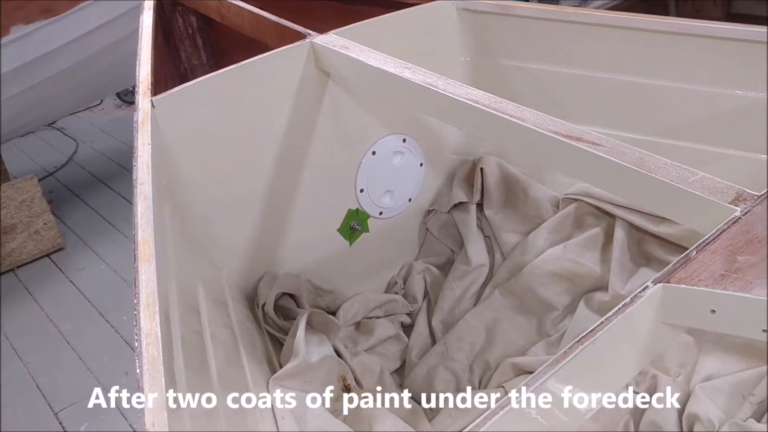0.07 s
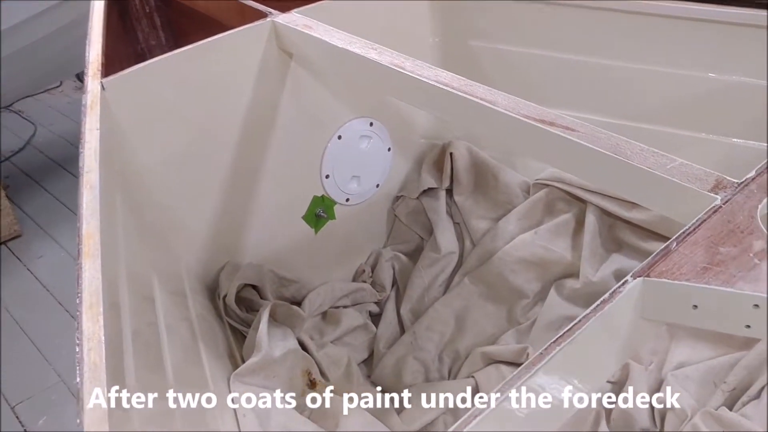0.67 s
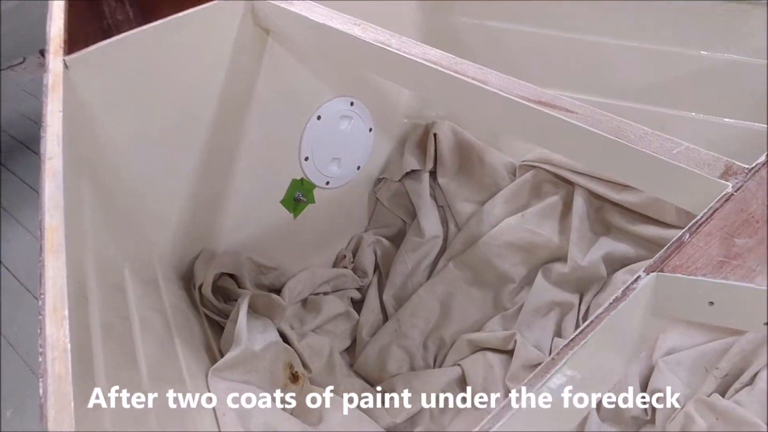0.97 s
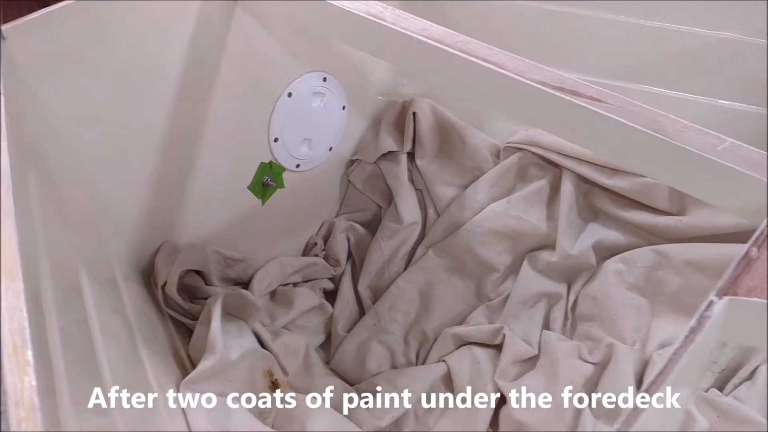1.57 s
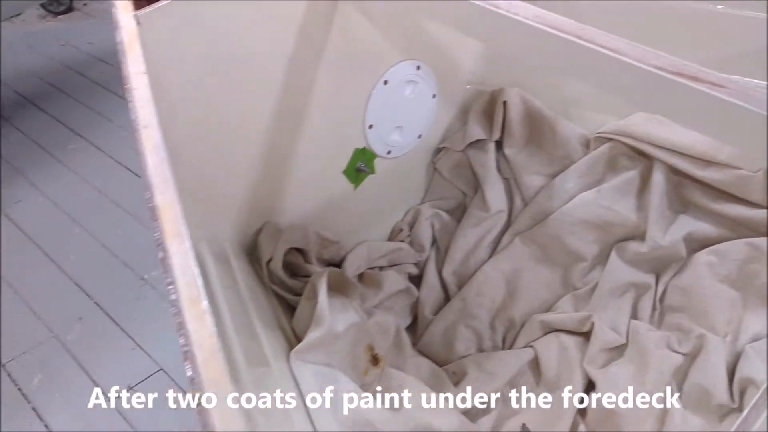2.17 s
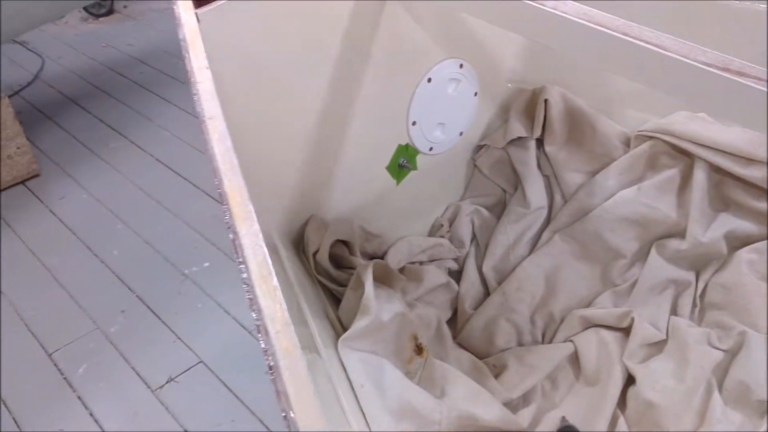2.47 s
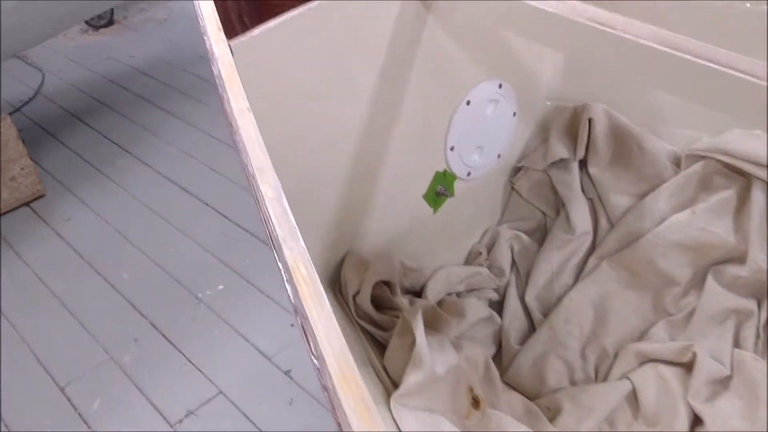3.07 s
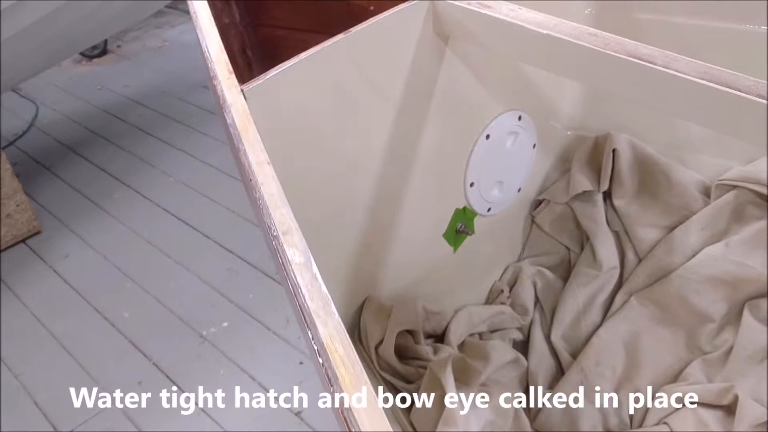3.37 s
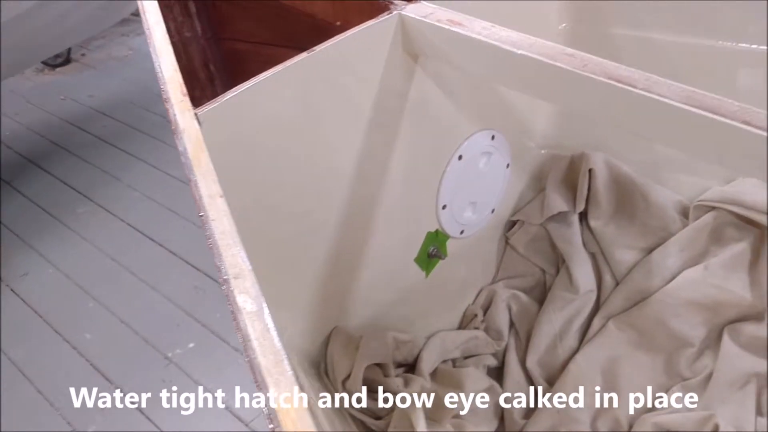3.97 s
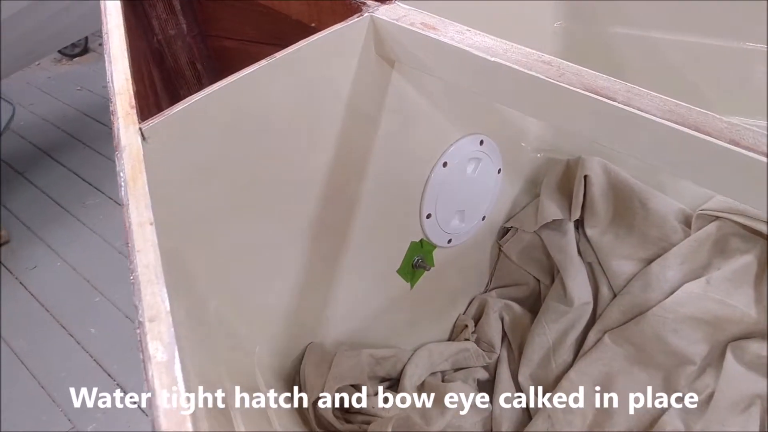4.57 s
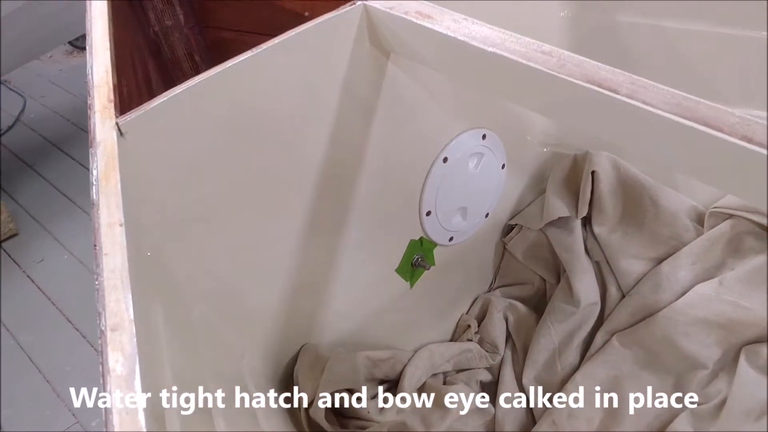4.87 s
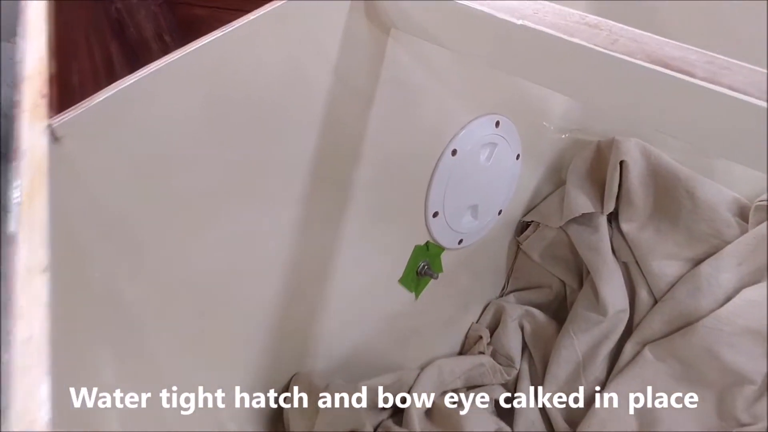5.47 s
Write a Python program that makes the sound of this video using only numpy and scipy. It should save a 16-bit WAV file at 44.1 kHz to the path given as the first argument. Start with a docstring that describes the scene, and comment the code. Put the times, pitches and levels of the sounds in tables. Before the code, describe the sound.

Slow, uneven footsteps thump on a wooden plank floor in a workshop, with light knocks and scuffs over a low hum.

```python
"""Slow steps in a barn workshop

Someone carrying a camera walks unevenly over a plank floor. Each shoe touches, lands and settles;
the boards boom and the room rings on. A few light knocks sound close by, shoes scuff, and a machine
hums under a soft hiss. The camera turns its volume down after heavy steps, then slowly back up."""
import sys
import numpy as np
from scipy import signal
from scipy.fft import rfft, irfft, next_fast_len
from scipy.io import wavfile
from scipy.ndimage import uniform_filter1d, minimum_filter1d

SR = 44100
rng = np.random.default_rng(int(sys.argv[2]) if len(sys.argv) > 2 else 0)


def master(y):
    """Save y as 16-bit WAV."""
    cut = np.clip(np.atleast_2d(y).T, -1, 1)
    pcm = np.round(cut * 32767)  # scale
    wavfile.write(sys.argv[1], SR, pcm.astype(np.int16))


N = 242991

# How long the barn rings. Each row: frequency in Hz, seconds to fade by 60 dB.
RING_TIMES = [(120, 0.43), (320, 0.47), (600, 0.47), (1200, 0.44), (2200, 0.42), (5800, 0.3), (12000, 0.25)]


def footstep(start, force_db, thud_db, click_db, early_s, touch_db, late_s, plank_hz, ring_db):
    """A shoe touches a plank, lands and settles: three blows, each with its start time."""
    # Contact time doubles for each 18.5 dB less force and halves for each 3 dB more click.
    contact_s = 0.0025 * 2 ** (-force_db / 18.5 - click_db / 3)
    touch = plank_blow(force_db + touch_db, 0, -3, plank_hz, ring_db,
                       contact_s=0.015, knock_s=0.091, tail_db=0, knock_db=-15.5)
    land = plank_blow(force_db, thud_db, click_db, plank_hz, ring_db,
                      contact_s, knock_s=0.014, tail_db=-0.5)
    settle = plank_blow(force_db - 4.5, thud_db, click_db - 0.5, plank_hz, ring_db,
                        contact_s, knock_s=0.017, tail_db=-2.5)
    return [(start - early_s, touch), (start, land), (start + late_s, settle)]


def plank_blow(force_db, thud_db, click_db, plank_hz, ring_db, contact_s, knock_s, tail_db, knock_db=-1):
    """One blow on wood: a short, close knock, then the long tail of floor and room."""
    # How a plank answers a shoe. Each row: frequency in Hz, level in dB.
    plank_tone = [(30, -32), (80, -17.5), (120, -12), (165, -2.5), (300, 0.5), (720, -3), (1100, -9),
                  (1700, -14), (2200, -14), (3500, -18), (4700, -25.5), (6500, -31), (8500, -41.5),
                  (14000, -58.5)]
    # The floor's own notes. Each row: pitch in Hz, width in Hz, boost in dB.
    floor_notes = [(165.5, 12, 4), (221.7, 16.7, 8), (365.2, 24.3, 8), (517.5, 20, 6.5), (577.5, 39, 7),
                   (677, 19, 4), (741, 16.5, 6), (1033, 44, 6.5), (1267, 6, 4), (1380, 14, 4.5),
                   (1494, 8.3, 4.5)]
    tail = barn_echoes()
    t = np.arange(tail.shape[1]) / SR
    press = 1 - np.exp(-t / max(contact_s, 1e-4))
    strength = amp(tail_db) + amp(knock_db) * np.exp(-t / knock_s)
    blow = press * (tail * strength + sole_snap(t))
    hz = np.fft.rfftfreq(2 ** 14, 1 / SR)
    notes_db = sum(db / (1 + (2 * (hz - pitch) / width) ** 2) for pitch, width, db in floor_notes)
    wood_db = look_up(plank_tone, hz) + notes_db + 3 * bump(hz, plank_hz, octaves=0.41)
    # Weight on the heel adds bass; a hard edge of the sole adds treble.
    shoe_db = look_up([(220, thud_db), (520, 0), (900, 0.014), (3200, click_db)], hz)
    colour = tone_filter(wood_db + shoe_db) / np.linalg.norm(tone_filter(wood_db))
    body = signal.fftconvolve(blow, colour[None], axes=1)[:, :len(t)]
    # The struck plank sings on at its own pitch.
    fade = amp(ring_db - 60 * t / look_up(RING_TIMES, plank_hz))
    ring = np.sin(2 * np.pi * (plank_hz * t + rng.random((2, 1)))) * press * fade
    return amp(force_db) * (body + ring)


def sole_snap(t, boost_db=12, fade_s=0.0034, above_hz=2800):
    """The sole's edge makes a bright crack, gone in a few milliseconds."""
    high_pass = signal.butter(2, above_hz, "highpass", fs=SR, output="sos")
    bright = signal.sosfilt(high_pass, rng.standard_normal((2, len(t))))
    return amp(boost_db) * np.exp(-t / fade_s) * bright


def barn_echoes(samples=32768):
    """Countless echoes blur into noise, and each pitch range fades at its own speed."""
    hz, t, bands = signal.stft(rng.standard_normal((2, samples)), SR, nperseg=256)
    fade = amp(-60 * t / look_up(RING_TIMES, hz)[:, None])
    tail = signal.istft(bands * fade, SR, nperseg=256)[1][:, :samples]
    # Even out chance peaks so that no pitch sticks out.
    spectrum = rfft(tail, 2 * samples)
    power = uniform_filter1d(abs(spectrum) ** 2, size=161, axis=1)
    smooth_power = uniform_filter1d(power, size=3001, axis=1)
    return irfft(spectrum * np.sqrt(smooth_power / power))[:, :samples]


def light_knock(force_db, thud_db, click_db, pitch_hz, knock_s=0.0018):
    """A brief, hollow knock on wood, so close that the room hardly answers."""
    knock = plank_blow(force_db, thud_db, click_db, pitch_hz,
                       ring_db=-34, contact_s=0.0015, knock_s=knock_s, tail_db=-16)
    t = np.arange(knock.shape[1]) / SR
    ping = np.sin(2 * np.pi * pitch_hz * t) * t / knock_s * np.exp(-t / knock_s)
    return knock + amp(force_db + 3) * ping


def scuffs(rasp_db=16, rasp_octaves=0.69):
    """Soles and clothes brush in soft swells of noise, each with a rasp at its own pitch."""
    # Each row: time of the peak in seconds, level in dB, half length in seconds, rasp pitch in Hz.
    swells = [(0.97, -44, 0.05, 4770), (1.382, -60.5, 0.33, 4530), (1.787, -41.5, 0.029, 1043),
              (2.022, -55, 0.03, 1500), (4.098, -53.5, 0.018, 1380), (4.23, -62, .015, 1140),
              (5.105, -54.5, 0.042, 5830), (5.456, -42, 0.024, 1520), (5.476, -49.5, 0.04, 4800)]
    # The tone of rubbing. Each row: frequency in Hz, level in dB.
    rub_tone = [(200, -36), (900, 11), (2000, 6.5), (4200, -9), (6500, -10), (9000, -8.5), (14000, -14)]
    t, out = np.arange(N) / SR, np.zeros((2, N))
    for peak_s, db, half_s, rasp_hz in swells:
        rub = noise(lambda hz: amp(look_up(rub_tone, hz) + rasp_db * bump(hz, rasp_hz, rasp_octaves)))
        out += rub * amp(db) * np.exp(-0.5 * ((t - peak_s) / half_s) ** 2)
    return out


def machine_hum(waver=0.24):
    """A machine holds low, steady tones; a narrow band of noise makes each one waver."""
    # Each row: pitch in Hz, level in dB, width of the wavering in Hz.
    tones = [(106.3, -50.5, 18), (202, -67, 8), (258.3, -60, 5)]
    t, out = np.arange(N) / SR, np.zeros((2, N))
    offset = np.array([[0], [1 / 4]])  # right is a quarter of a cycle ahead
    for pitch, db, width in tones:
        steady = np.sqrt(2) * np.cos(2 * np.pi * (pitch * t + rng.random() + offset))
        wobble = noise(lambda hz: 1 / (1 + ((hz - pitch) / width) ** 2))
        out += amp(db) * unit(steady + waver * wobble)
    return out


def air_hiss(level_db=-51):
    """The workshop's air makes a soft, steady hiss."""
    # Each row: frequency in Hz, relative level in dB.
    air_tone = [(25, -24), (60, -9), (110, -3), (260, -4.5), (400, -8), (700, -12), (1100, -16),
                (1700, -21), (2600, -17), (3400, -23.5), (4400, -16.5), (5400, -23), (8000, -28),
                (14500, -36.5)]
    return amp(level_db) * noise(lambda hz: amp(look_up(air_tone, hz)))


def microphones(pair, balance, swing_hz=2570):
    """Two spaced microphones: the bass arrives out of step, and higher pitches go in and out of step."""
    # Each row: frequency in Hz, how alike left and right are from 0 to 1.
    likeness = [(40, 0.45), (120, 0.92), (380, 0.61), (1200, 0.87), (2600, 0.92), (4000, 0.75),
                (13000, 0.65)]
    # Each row: frequency in Hz, how far the left wave is ahead in radians.
    left_lead = [(100, -1.96), (300, -0.96), (600, -0.79), (1300, 0.12)]
    hz = np.fft.rfftfreq(N, 1 / SR)
    alike = look_up(likeness, hz)
    middle, side = rfft(pair) * np.sqrt([(1 + alike) / 2, (1 - alike) / 2])
    swing = 2 * np.pi * np.maximum(hz / swing_hz - 0.5, 0)
    phase = look_up(left_lead, hz) + swing - 0.079 * np.sin(2 * swing)
    shift = np.exp(0.5j * phase) * amp(look_up(balance, hz) / 2)
    return irfft(np.array([(middle + side) * shift, (middle - side) / shift]), N)


def amp(db):
    """Turns decibels into a number to multiply by."""
    return 10 ** (np.asarray(db) / 20)


def unit(sound):
    """Scales a sound to an average power of 1."""
    return sound / np.sqrt(np.mean(sound ** 2) + 1e-20)


def look_up(table, hz):
    """Reads a table at any frequency, sliding between its rows along a musical scale."""
    row_hz, values = np.transpose(table)
    return np.interp(np.log(hz + 1), np.log(row_hz + 1), values)


def bump(hz, centre_hz, octaves):
    """A bell-shaped hill of height 1 around one pitch."""
    return np.exp(-0.5 * (np.log2((hz + 1) / centre_hz) / octaves) ** 2)


def add(mix, start, sound):
    """Mixes a sound in at a start time in seconds."""
    part = mix[:, round(start * SR):][:, :sound.shape[1]]
    part += sound[:, :part.shape[1]]


def noise(gain):
    """Two unrelated noises of power 1, their tone shaped by gain(hz)."""
    size = next_fast_len(N, True)
    white = rfft(rng.standard_normal((2, size)))
    return unit(irfft(white * gain(np.fft.rfftfreq(size, 1 / SR)), size)[:, :N])


def tone_filter(db):
    """A filter with the given tone that answers as early as it can (minimum phase)."""
    log_gain = np.log(amp(np.r_[db, db[-2:0:-1]]))
    spectrum = np.exp(np.conj(signal.hilbert(log_gain)))
    return np.fft.ifft(spectrum).real[:len(db)]


def scene():
    """Steps and knocks a little to the left, with scuffs, hum and hiss around them."""
    # Each row: landing time in seconds, force in dB, extra thud in dB, extra click in dB,
    # seconds from first touch to landing, touch force in dB relative to the landing,
    # seconds from landing to settling, the plank's pitch in Hz, its ring in dB.
    steps = [ (0.252, -13, 4.5, -1, 0.0051, -6.5, 0.031, 741.7, -7),
             (0.6253, -6.5, -2.5, -4.5, 0.044, -7.5, 0.03, 678, -18),
             (1.262, -40, -7, -0.5, 0.0053, -22.5, 0.034, 387, -27),
             (1.753, -34, 3.5, 1, 0.019, -2, 0.027, 984, -5),
             (2.457, -18, 7, -3.5, 0.0022, -4, 0.018, 418.4, -2.5),
             (2.7126, -4.5, -5, 3, 0.044, -12.5, 0.011, 1423, -14),
             (3.149, -17, -13.5, 0.5, 0.03, -11.5, 0.014, 1018, -14.5),
             (3.247, -25.5, -13.5, 2.5, 0.0053, -17, 0.031, 762, -28),
             (5.082, -36, 9.5, 0.5, 0.008, -4.5, 0.022, 976, -14),
             (5.434, -37, 2, -4, 0.024, -1, 0.021, 1360, -9)]
    # Each row: start in seconds, force in dB, extra thud in dB, extra click in dB, pitch in Hz.
    knocks = [(2.376, -21, -4.5, -18, 690), (5.104, -22, -19, -24, 797), (5.402, -31.5, 11, -9, 310)]
    # Each row of both balances: frequency in Hz, how much louder the left is in dB.
    wood_balance = [(60, -1), (160, 5.5), (330, 1.5), (600, 1.5), (1000, 0)]
    room_balance = [(250, 0.0), (900, 0.1)]
    wood = np.zeros((2, N))
    for step in steps:
        for start, sound in footstep(*step):
            add(wood, start, sound)
    for start, *knock in knocks:
        add(wood, start, light_knock(*knock))
    room = machine_hum() + air_hiss() + scuffs()
    return microphones(wood, wood_balance) + microphones(room, room_balance)


def record(dry, threshold_db=-23, squeeze=0.46, hold_s=0.14, recovery_db_per_s=4.0, top_hz=15000):
    """The camera's volume drops on a loud step, holds and creeps back; the highest treble is cut."""
    power = abs(uniform_filter1d((dry ** 2).mean(0), size=1101))
    cut_db = squeeze * np.maximum(10 * np.log10(power + 1e-12) - threshold_db, 0)
    half_hold = round(hold_s * SR / 2)
    held_db = -minimum_filter1d(-cut_db, 2 * half_hold + 1, origin=half_hold, mode="constant")
    climb_db = recovery_db_per_s * np.arange(N) / SR
    volume_db = climb_db - np.maximum.accumulate(held_db + climb_db)
    low_pass = signal.firwin(1023, top_hz, window=("kaiser", 9), fs=SR)
    return signal.oaconvolve(dry * amp(volume_db), low_pass[None], "same", axes=1)


dry = scene()
out = record(dry)
master(out)
```